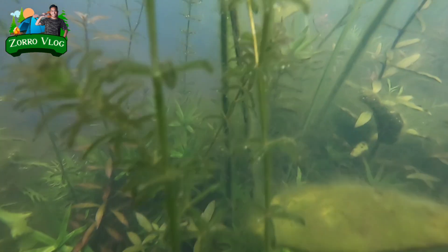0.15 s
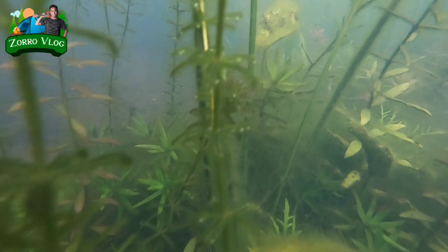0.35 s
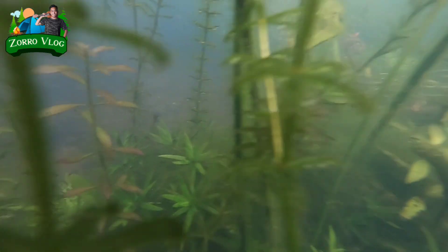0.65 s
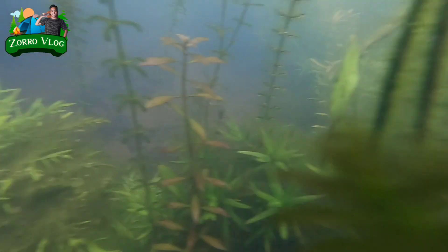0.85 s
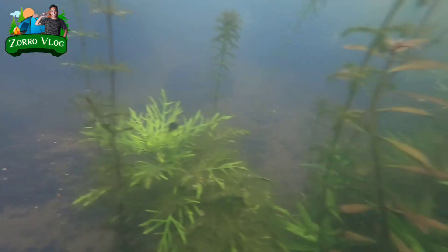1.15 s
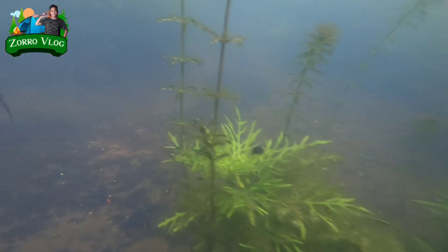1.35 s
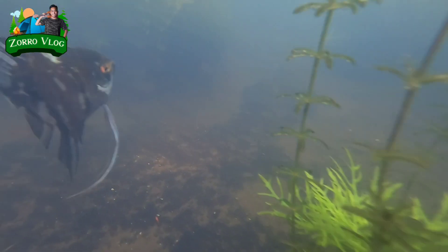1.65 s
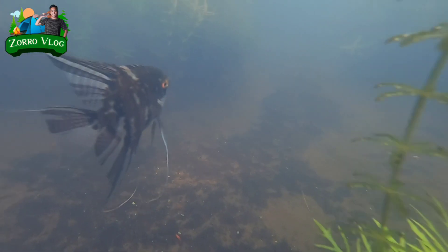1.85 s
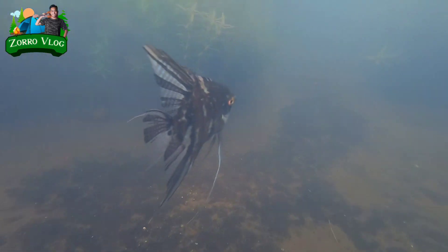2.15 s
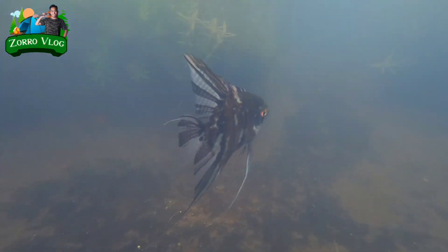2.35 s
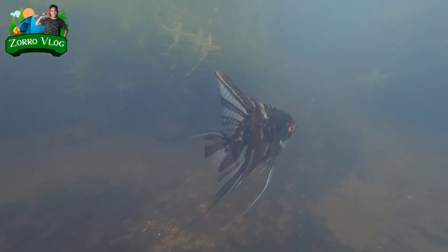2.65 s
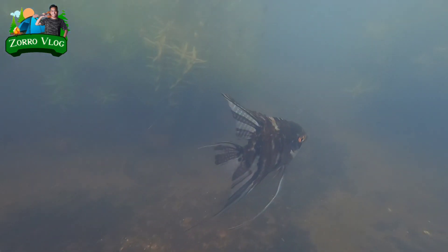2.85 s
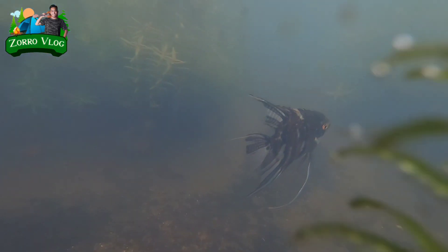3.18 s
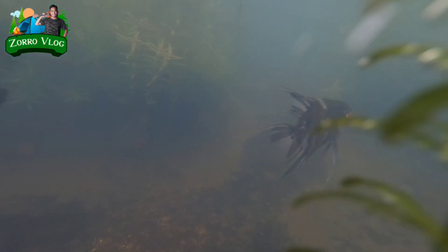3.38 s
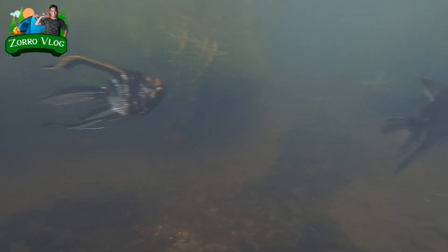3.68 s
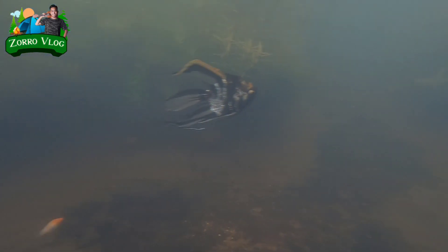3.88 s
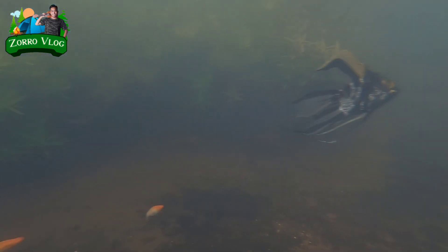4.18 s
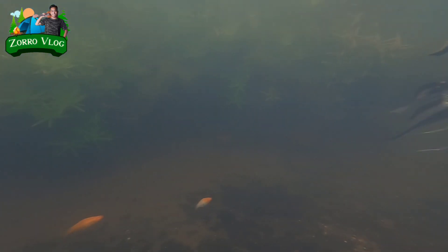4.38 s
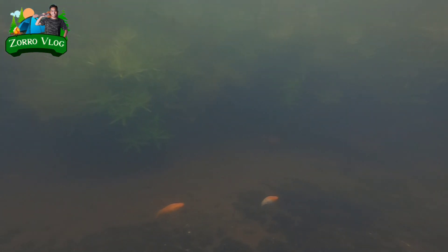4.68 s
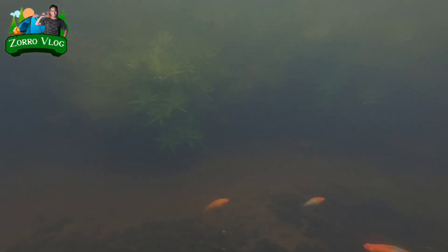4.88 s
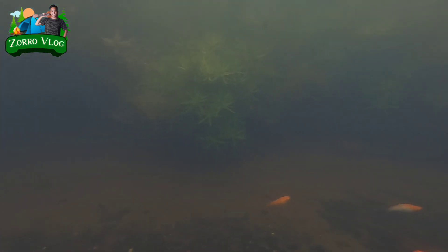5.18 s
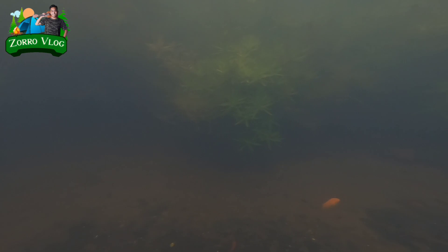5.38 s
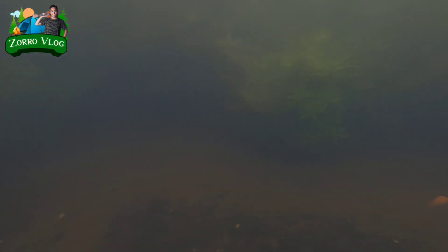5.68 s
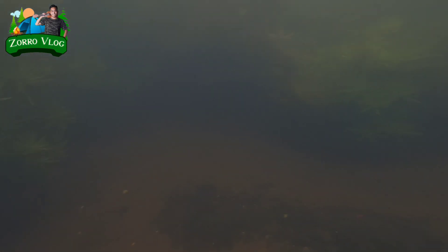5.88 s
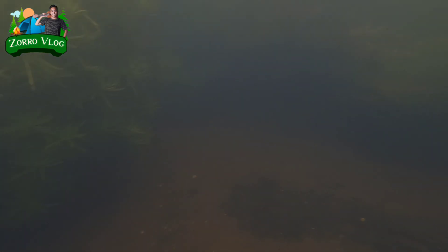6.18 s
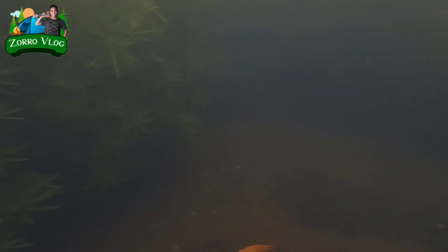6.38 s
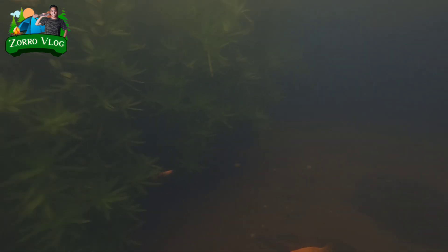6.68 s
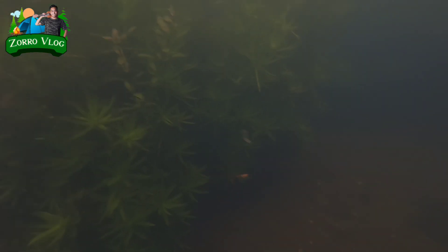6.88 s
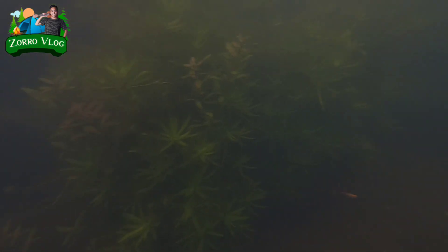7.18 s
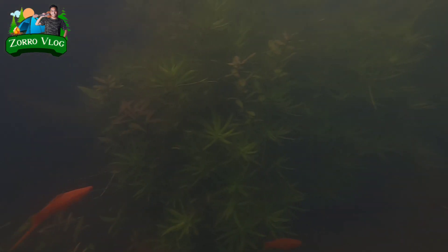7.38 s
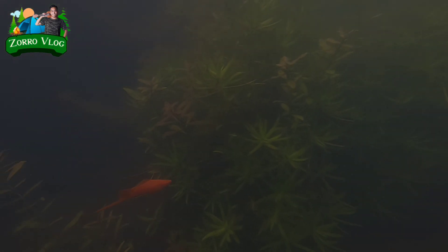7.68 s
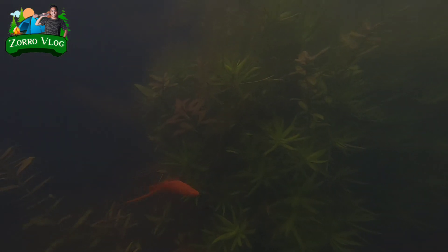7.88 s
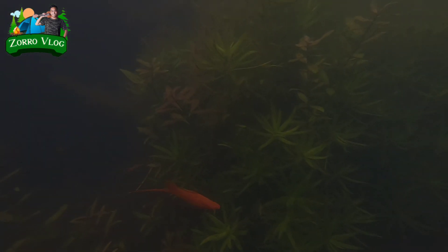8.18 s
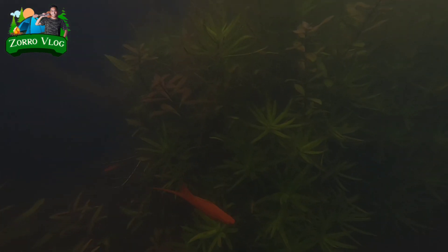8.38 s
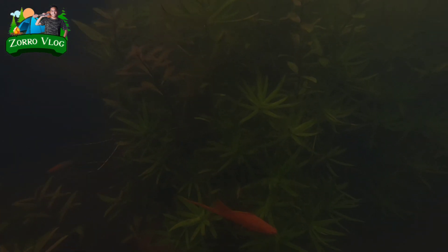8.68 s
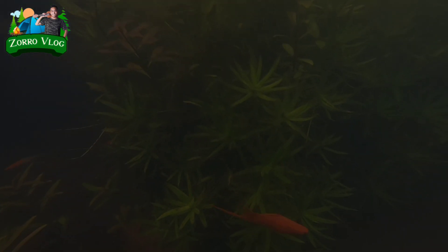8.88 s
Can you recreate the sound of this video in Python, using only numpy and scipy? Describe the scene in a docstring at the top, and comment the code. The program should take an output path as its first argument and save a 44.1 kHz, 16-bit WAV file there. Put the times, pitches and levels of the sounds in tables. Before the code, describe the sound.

Close underwater sound from inside a sealed camera case moved by hand through pond weeds. Dull rubbing and hollow knocks begin at once, with a very sharp click and short groan near one second. A dense crackling cluster of leaf scratches and ticks follows just before three seconds. The middle is quiet with sparse ticks, then heavy thumps and a hard double clunk come after six seconds, fading to faint rumble and hiss.

```python
"""Pond weeds rub, scrape and knock on a sealed camera case swept by hand: bursts of tiny slips ring its resonances.
Water pushes as low noise, bumps swing deeply, and the gripping hand thumps, creaks and sets low modes humming.
Leaves scratch and wash as filtered grains and noise; leaf tips and small clear ticks are short dying tones.
A stem groans in two gliding overtones and others hum as wavering sines, all over a steady hiss.
Two microphones hear the case almost in opposition; near the end the stereo narrows almost to mono."""
import sys
import numpy as np
from scipy import signal
from scipy.fft import rfft, irfft
from scipy.io import wavfile

SR = 44100
rng = np.random.default_rng(int(sys.argv[2]) if len(sys.argv) > 2 else 0)


def wav_out(sig):
    """Save sig, one row per channel (or a flat mono array), as 16-bit PCM at SR to the path in sys.argv[1]."""
    wavfile.write(sys.argv[1], SR, np.round(np.clip(np.atleast_2d(sig).T, -1, 1) * 32767).astype(np.int16))


N = 399105
HZ, TIME = np.fft.rfftfreq(N, 1 / SR), np.arange(N) / SR

# resonances of the sealed case: pitch_hz, half_width_hz, relative_db
CASE_MODES = [(98.5, 12.2, -8.5), (145, 8.9, -3), (211.5, 16.7, -7), (290.4, 20, -15), (437, 690, -34.5),
              (591.4, 74.4, -9.5), (615, 20, -9), (677, 216, -20.5), (837, 24, -20), (1119, 95, -20.5),
              (1446, 200, -21), (1760, 110, -29.5), (2180, 520, -41), (2687, 120, -42.5),
              (3200, 260, -48.5), (4270, 2000, -56.5)]
# how the two microphones differ: pitch_hz, left_lead_rad, left_minus_right_db, likeness (0-1)
MICROPHONE_PAIR = [(55, 0.3, 1, 0.95), (108.6, 1.77, 7, 0.7), (145.3, 1.5, -10.5, 0.5),
                   (214.4, -3.5, 11.5, 0.66), (283, -2.5, 3.5, 0.92), (476, -2.5, 1.5, 0.97),
                   (516, -3, 3.5, 1), (657, -2.5, 0, 0.98), (754, -2.5, 1.5, 1), (1230, -3, -2, 0.74),
                   (1615, -1.69, -2, 1), (2080, -2.5, -4, 0.82), (2620, -2.5, 0.5, 0.57),
                   (3530, -2.5, 1.5, 0.2), (8300, 0, 18.5, 0.34)]
# push of the water, following the speed of the sweep: start_s, level_db
WATER_PUSH = [(0.0, -38.5), (0.33, -49.5), (0.44, -46), (0.9, -32), (1.25, -42.5), (2.3, -35.5), (3.6, -38),
              (3.85, -48.5), (5.1, -46), (5.35, -43), (6.1, -34), (6.38, -23.5), (6.7, -30.5), (7.4, -36),
              (8.2, -38), (9.05, -42.5)]
# colour of that push: pitch_hz, relative_db (per Hz)
WATER_COLOUR = [(5, -15.5), (14, 15.5), (24, 5), (34, 6), (50, -10.5), (66, -7), (85, -36.5), (130, -34),
                (250, -99.5)]
# weeds and water sliding along the case: start_s, dull_db, bright_db
WEED_RUB = [(0.0, -38.5, -43.5), (0.6, -41.5, -53), (1.05, -38, -50), (1.5, -46.5, -52), (1.97, -49.5, -54),
            (2.42, -52, -58), (2.72, -40, -53), (3.0, -46.5, -55), (3.45, -50.5, -64.5), (3.65, -53, -61),
            (4.6, -62, -68), (5.75, -60, -67), (6.02, -44.5, -67.5), (6.55, -54.5, -67), (7.1, -44.5, -58),
            (7.62, -58, -72), (8.5, -66.5, -68.5), (9.05, -56.5, -67.5)]
# the hand tightens on the case: start_s, length_s, thump_db, finger_creak_db
HAND_SQUEEZES = [(0.418, 0.16, -44, -53.5), (0.656, 0.24, -47.5, -51.5), (0.844, 0.16, -39.5, -50),
                 (1.06, .16, -44.5, -49), (1.403, .16, -40, -45), (1.654, 0.3, -59, -57),
                 (2.011, 0.17, -48, -51), (2.495, .056, -55, -48), (2.845, 0.22, -50.5, -57),
                 (3.33, 0.21, -53.5, -57.5), (4.06, 0.12, -54, -64), (5.27, 0.3, -47, -56),
                 (5.689, 0.21, -42, -47), (5.905, 0.26, -41, -41), (6.232, 0.06, -39.5, -46),
                 (6.353, 0.056, -37.5, -35), (6.495, .31, -45.5, -56.5), (6.753, .094, -35.5, -46.5),
                 (6.898, 0.25, -42.5, -61), (7.144, 0.15, -46.5, -53), (7.306, 0.69, -56.5, -66.5),
                 (7.969, 0.12, -51, -62)]
# rough leaves brushing the front, one table a pass: start_s, level_db
LEAF_PASSES = [
    [(0.0, -59.5), (0.364, -63), (0.768, -58), (0.912, -48), (1.0, -74)],
    [(2.465, -70), (2.522, -53.5), (2.655, -64.5), (2.69, -44), (2.784, -43), (2.91, -60.5), (3.502, -62.5),
     (3.6, -94)],
]
# colour of the leaf scratch: pitch_hz, relative_db (per Hz)
SCRATCH_COLOUR = [(700, -11), (1200, 22.5), (1700, 9.5), (2700, 10.5), (3350, -1), (4200, 0), (5400, -8.5),
                  (6500, -6.5), (7600, -15), (8700, -8), (11000, -33.5), (14000, -38)]
# leaves pressing on the front drum hollowly: start_s, level_db
LEAF_DRUMMING = [(2.66, -86), (2.7, -49.5), (2.86, -48.5), (3.02, -64.5), (3.3, -57.5), (3.38, -59),
                 (3.5, -70), (3.62, -97)]
# the hollow body they drum on: pitch_hz, width_octaves, relative_db
HOLLOW_BODY = [(352.4, 0.11, 6.5), (416, 0.061, -3)]
# fine fronds washing smoothly over the front: start_s, length_s, level_db, pitch_hz
FROND_WASHES = [(0.0, 0.66, -75.5, 3350), (3.026, 0.26, -65, 2920)]
# a stem catches and drags: start_s, length_s, level_db, rasp_pitch_hz
STEM_SCRAPES = [(.005, 0.029, -36.5, 1010), (0.026, 0.42, -48.5, 227), (0.03, 0.14, -46.5, 980),
                (0.165, 0.086, -47.5, 2200), (0.173, 0.045, -34, 628), (0.371, 0.056, -59.5, 2850),
                (0.546, 0.019, -38.5, 560), (0.721, 0.026, -42.5, 570), (.858, 0.038, -39, 2800),
                (.859, 0.022, -36, 546), (0.898, 0.04, -44.5, 2730), (1.659, 0.17, -54.5, 1050),
                (1.785, 0.041, -55, 1210), (1.842, 0.057, -45.5, 950), (2, 0.29, -49, 540),
                (2.484, 0.0204, -43, 3100), (2.492, 0.085, -57.5, 3900), (2.52, 0.083, -60, 586),
                (2.681, 0.078, -39, 2426), (2.706, 0.032, -35.5, 1210), (2.756, 0.0377, -31, 2380),
                (2.807, 0.05, -46, 1120), (2.857, 0.1, -50, 596), (3.02, 0.33, -58, 1090),
                (3.344, 0.049, -42, 573), (3.345, 0.06, -45, 1130), (3.371, 0.031, -51, 1210),
                (3.362, 0.037, -62, 2860), (3.605, 0.53, -63, 1050), (6.372, 0.036, -39.5, 2010),
                (6.375, 0.028, -35, 994), (6.37, 0.036, -26.5, 496)]
# colour of the crackle on a scrape: pitch_hz, relative_db (per Hz)
CRACKLE_COLOUR = [(1200, -39.5), (2400, 8), (3300, 2.5), (4300, -12.5), (5400, -7.5), (6500, -12.5),
                  (7600, -18.5), (8700, -13), (11000, -29.5), (14000, -39)]
# a taut leaf sings hoarsely as it slides: start_s, length_s, level_db, pitch_hz
LEAF_RASPS = [(0.01, 0.23, -75, 3100), (0.35, 0.64, -65, 2730), (0.862, 0.014, -60, 3270),
              (0.854, 0.061, -44, 2400), (2.446, 0.242, -61, 3260), (2.808, 0.47, -63, 2650)]
# blunt blows on the case: start_s, peak_db, pitch_hz
CASE_KNOCKS = [(.324, -37, 1050), (.421, -20.5, 890), (.716, -23, 607), (0.8888, -5, 2400),
               (0.889, -32, 600), (1.078, -35.5, 1500), (1.395, -32, 1160), (1.396, -27.5, 590),
               (1.514, -34, 1870), (1.676, -31.5, 875), (1.904, -28, 910), (2.474, -23, 2760),
               (2.502, -25, 3550), (2.503, -27.5, 550), (2.687, -24, 2130), (2.722, -26, 600),
               (2.789, -40, 2500), (2.792, -23, 695), (3.016, -33, 1120), (3.017, -24, 570),
               (3.393, -33, 1100), (4.15, -34, 625), (4.3666, -27, 656), (4.567, -44, 655),
               (5.163, -35, 563), (5.35, -28.5, 1000), (5.699, -30.5, 596), (5.761, -30.5, 580),
               (5.803, -30.5, 600), (6.23, -48, 620), (6.376, -19, 940), (6.4105, -24, 2200),
               (6.411, -22, 790), (7.337, -39, 520), (7.478, -35, 860)]
# leaf tips snapping past the case: start_s, level_db (before the soft onset), pitch_hz
LEAF_SNAPS = [(0.3551, -54, 3040), (0.4874, -61, 3250), (0.6964, -53, 3400), (0.821, -53, 3350),
              (2.5104, -39.5, 4940), (2.611, -47.5, 3400), (2.6284, -52, 5550), (2.7964, -54, 6700),
              (2.8314, -44, 3400), (2.894, -45, 3700), (2.902, -42.5, 3170), (2.9198, -46, 2800),
              (2.9365, -39.5, 2670), (2.9367, -45, 4600), (2.9369, -45, 1470), (2.952, -57, 4030),
              (2.984, -56, 4330), (2.999, -44.5, 3120), (3.094, -50, 3500), (3.242, -49, 2810),
              (3.408, -54.5, 5600), (3.453, -48, 2530), (3.485, -54, 2770), (3.497, -54, 2470),
              (4.421, -52.5, 2380), (4.996, -60, 2010), (8.27, -61.5, 1750)]
# small clear ticks, many of them a faint regular ticking near 2.7 kHz, perhaps the camera's mechanism:
# start_s, level_db (before the soft onset), pitch_hz
SMALL_TICKS = [(.589, -43.5, 2140), (1.946, -60, 2870), (2.07, -50, 2530), (2.325, -51, 2740),
               (2.867, -43, 6500), (2.9854, -33.5, 2550), (3.28, -48.5, 2770), (3.68, -42, 4950),
               (3.6795, -52, 3800), (3.6797, -55, 2280), (3.829, -49, 2700), (3.937, -42.5, 1870),
               (4.187, -50.5, 2640), (4.575, -50, 2600), (4.958, -49, 2630), (5.329, -54, 2530)]
# a stiff stem strikes twice: start_s, level_db (before the soft onset), pitch_hz
STEM_CLUNKS = [(6.3725, -20.5, 1567), (6.4103, -23.5, 1606)]
# the lowest modes of the case: pitch_hz, t60_s, left_lead_rad, left_minus_right_db
LOW_MODES = [(98.95, 0.2, 0.82, 4), (146.8, 0.42, 1.85, -11.5), (214.7, 0.35, -2, 5.5)]
# pushes of the hand: start_s, length_s, first_mode_db, second_mode_db, third_mode_db
HAND_JOLTS = [(0.38, 0.26, -51.5, -49, -55.5), (0.84, 0.15, -41, -48, -51.5),
              (1.06, 0.17, -45.5, -52, -47.5), (1.4, 0.085, -44, -45, -51.5),
              (1.51, 0.064, -45, -43, -45.5), (2.87, 0.14, -44, -48, -50), (5.41, 0.071, -48.5, -44.5, -54),
              (5.699, 0.17, -37.5, -40, -70), (5.9, 0.074, -37.5, -47, -61),
              (6.01, 0.11, -38.5, -43.5, -48), (6.23, 0.076, -40, -55, -47.5),
              (6.373, 0.065, -48, -32.5, -55), (6.771, 0.098, -37.5, -50, -40.5),
              (6.9, 0.068, -43, -52.5, -49), (7.055, 0.11, -38, -41.5, -54),
              (8.215, 0.036, -66, -51.5, -77), (8.374, 0.045, -73, -51.5, -85)]
# the camera bumps through the water: start_s, level_db (before onset and decay), pitch_hz
WATER_BUMPS = [(0.426, -24, 41.4), (0.875, -29, 44), (1.539, -25, 47), (6.245, -23, 48.5),
               (6.48, -27.5, 42)]
# a stem bends against the case: start_s, base_pitch_hz, level_db (before the overtone mix)
STEM_GROAN = [(0.78, 141.2, -58), (0.839, 140.4, -47), (0.9, 146.3, -33.5), (0.96, 145, -44),
              (1.02, 151.2, -44), (1.09, 161.1, -68)]
# overtones of the groan that the case lets through: multiple, relative_db
GROAN_OVERTONES = [(3, -8.5), (4, -1.5)]
# a smooth stem makes the case sing on its main resonance: start_s, length_s, level_db, pitch_hz
STEM_HUMS = [(3.972, 0.16, -60.5, 595), (4.106, 0.043, -52.5, 612), (4.427, 0.022, -57.5, 590),
             (4.701, 0.03, -62, 616), (4.718, 0.11, -62.5, 614), (6.791, 0.054, -41.5, 606.2),
             (7.21, 0.21, -55, 604), (8.342, 0.055, -55.5, 610)]
# soft weed swishing past: peak_s, rise_s, fall_s, dull_db, bright_db, bright_skirt_pitch_hz
WEED_SWISHES = [(5.449, 0.03, 0.061, -51, -55, 1620), (6.051, 0.079, 0.057, -42.5, -42.5, 1940),
                (6.293, 0.037, 0.078, -40, -53.5, 1630), (6.811, 0.03, 0.055, -37, -43, 2430),
                (7.054, 0.018, 0.016, -46, -50, 1400), (7.165, 0.035, 0.028, -50.5, -54, 1510),
                (8.05, 0.11, 0.059, -63, -61.5, 1630)]
# colour of the microphone hiss: pitch_hz, relative_db (per Hz)
HISS_COLOUR = [(20, -7), (150, 17.5), (300, 2.5), (450, -5.5), (600, 4.5), (1100, -3.5), (1700, -6.5),
               (2700, -4.5), (4000, -11), (7000, -18), (10000, -18.5), (11500, -36.5), (14000, -44)]
# stereo width: start_s, side_db
STEREO_WIDTH = [(7.6, -4.5), (8.0, -13.5), (8.4, -24), (9.0, -41)]

HISS_DB = -67
EDGE_HZ = 13500  # upper band limit
SQUEEZE_ATTACK_S, SQUEEZE_RELEASE_S = 0.008, 0.034
FLEX_DB = -2  # flex of the case in a squeeze, re its thump
RUB_FLEX_DB, RUB_GRIP_DB = -27.5, -13  # the weeds' drag also loads case and fingers, re the dull rub
MIDDLE_EVEN_DB = -48  # here the middle resonance equals the bright rub
MIDDLE_GROWTH = 0.97  # dB of middle per dB of bright rub
CRACKLE_FULL_HZ, CRACKLE_DB_PER_OCTAVE, CRACKLE_LEAST_DB = 2844, 69, -56  # higher rasps crackle more


def amp(db):
    """Decibels to gain."""
    return 10 ** (np.asarray(db) / 20)


def unit(x):
    """Scales to rms 1."""
    return x / np.sqrt(np.mean(x ** 2) + 1e-30)


def read(points, column=1):
    """A table over frequency, joined on a log axis."""
    table = np.array(points)
    return np.interp(np.log(HZ + 1), np.log(table[:, 0] + 1), table[:, column])


def level(rows, column=1):
    """A dB curve over time as a gain."""
    table = np.array(rows)
    return amp(np.interp(TIME, table[:, 0], table[:, column]))


def add(mix, s, sound):
    """Mixes a sound in at time s."""
    part = mix[..., round(s * SR):][..., :sound.shape[-1]]
    part += sound[..., :part.shape[-1]]


def shaped(x, gain):
    """Filters by a gain per frequency, to rms 1."""
    return unit(irfft(rfft(x) * gain, N))


def band(x, centre_hz, octaves, order=2):
    """Band-pass around a pitch."""
    edges = centre_hz * 2 ** (np.array([-.5, .5]) * octaves)
    edges = np.clip(edges, 5, .49 * SR)
    return signal.sosfilt(signal.butter(order, edges, "band", fs=SR, output="sos"), x)


def flutter(per_s, depth_db, step=32):
    """A random gain that wanders about per_s times a second."""
    coarse = TIME[::step]
    noise = rng.standard_normal(len(coarse))
    slow = np.exp(-(np.fft.rfftfreq(len(coarse), step / SR) / per_s) ** 2)
    wander = irfft(rfft(noise) * slow, len(coarse))
    return amp(depth_db * np.interp(TIME, coarse, unit(wander)))


def slips(per_s, spread_db):
    """Friction as tiny slips of either sign; a positive spread makes a few much larger, a negative one smaller."""
    size = amp(spread_db * np.minimum(rng.exponential(1, N), 4))
    sign = rng.choice([-1, 1], N)
    happens = rng.random(N) < per_s / SR
    return unit(size * sign * happens)


def case_response(size=8192):
    """How the case answers one tap: its resonances, starting sharply and dying away."""
    hz = abs(np.fft.fftfreq(size, 1 / SR))
    power = sum(amp(db) ** 2 / (1 + ((hz - f) / width) ** 2) ** 2 for f, width, db in CASE_MODES)
    log_gain = np.log(power + 1e-12) / 2
    minimum_phase = np.exp(signal.hilbert(log_gain).conj())  # puts the energy as early as possible
    return np.fft.ifft(minimum_phase).real


def water(port_lag_s=0.0036):
    """Low pressure noise of the moving water; it reaches the right microphone a moment later."""
    push = level(WATER_PUSH) * shaped(rng.standard_normal(N), amp(read(WATER_COLOUR)))
    return np.array([push, np.interp(TIME - port_lag_s, TIME, push)])


def hiss():
    """Steady coloured noise of the microphones, separate on each side."""
    return amp(HISS_DB) * shaped(rng.standard_normal((2, N)), amp(read(HISS_COLOUR)))


def squeezing(column):
    """All squeezes as one gain: each rises, holds and dies away."""
    out, t = np.zeros(N), TIME[:SR]
    for row in HAND_SQUEEZES:
        attack = np.minimum(t / SQUEEZE_ATTACK_S, 1)
        release = np.exp(-np.maximum(t - row[1], 0) / SQUEEZE_RELEASE_S)
        add(out, row[0], amp(row[column]) * attack * release)
    return out


def handling(case):
    """Squeezes thump and drive the low case resonances; sliding weeds drive the middle and upper ones."""
    def drive(force, centre_hz, octaves):
        """Rings the case with one band of a force."""
        return unit(signal.oaconvolve(band(force, centre_hz, octaves), case)[:N])
    flex = drive(slips(per_s=300, spread_db=0.5), centre_hz=81.1, octaves=0.67)
    grip = drive(slips(per_s=350, spread_db=2.5), centre_hz=220.0, octaves=1.73)
    friction = slips(per_s=1400, spread_db=3.0) * flutter(per_s=7.7, depth_db=3.5)
    dull, bright = level(WEED_RUB), level(WEED_RUB, column=2)
    middle = amp(MIDDLE_EVEN_DB) * (bright / amp(MIDDLE_EVEN_DB)) ** MIDDLE_GROWTH
    rub = dull * drive(friction, centre_hz=568, octaves=1.53)
    rub += middle * drive(friction, centre_hz=1041, octaves=0.91)
    rub += bright * drive(friction, centre_hz=2060, octaves=0.87)
    squeeze = squeezing(column=2)
    thump = squeeze * unit(band(rng.standard_normal(N), centre_hz=51.4, octaves=0.72, order=3))
    flex *= np.hypot(amp(FLEX_DB) * squeeze, amp(RUB_FLEX_DB) * dull)
    grip *= np.hypot(squeezing(column=3), amp(RUB_GRIP_DB) * dull)
    return thump + flex + grip + rub


def leaves():
    """Rough leaves scratch at the microphones, each pitch in its own spurts, and drum on the hollow front."""
    touch = sum(level(rows) * (TIME > rows[0][0]) * (TIME < rows[-1][0]) for rows in LEAF_PASSES)
    grains = np.zeros(N)
    for hz in np.geomspace(1100, 11000, 9):
        spurts = slips(per_s=900, spread_db=-3.5) * flutter(per_s=37, depth_db=7.5)
        grains += band(spurts, hz, octaves=0.38)
    scratch = touch * shaped(grains, amp(read(SCRATCH_COLOUR)))
    force = slips(per_s=990, spread_db=0.5)
    drum = unit(sum(amp(db) * band(force, hz, octaves) for hz, octaves, db in HOLLOW_BODY))
    return scratch + level(LEAF_DRUMMING) * drum


def washes(width_octaves=0.53):
    """Countless tiny contacts merge into a smooth, bright wash of band-passed noise."""
    out = np.zeros(N)
    for s, length, db, hz in FROND_WASHES:
        press = signal.windows.tukey(int(length * SR), 0.2)
        noise = rng.standard_normal(len(press))
        add(out, s, amp(db) * press * unit(band(noise, hz, width_octaves, order=3)))
    return out


def scrapes(case):
    """Short dense runs of slips ring the case, with crackle on top."""
    out, force = np.zeros(N), slips(per_s=7100, spread_db=3.0)
    crackle = shaped(slips(per_s=1400, spread_db=5.5), amp(read(CRACKLE_COLOUR)))
    for s, length, db, hz in STEM_SCRAPES:
        taper = min(0.084 + length / 0.58, 1)  # long drags swell gradually
        press = signal.windows.tukey(max(int(length * SR), 16), taper)
        at = round(s * SR) + np.arange(len(press))
        rasp = band(signal.fftconvolve(force[at] * press, case), hz, octaves=0.81)
        rasp *= np.sqrt(len(press) / np.sum(rasp ** 2))  # level counted over the length of the drag
        crackle_db = CRACKLE_DB_PER_OCTAVE * np.log2(hz / CRACKLE_FULL_HZ)
        crackle_db = np.clip(crackle_db, CRACKLE_LEAST_DB, 0)
        add(out, s, amp(db) * rasp)
        add(out, s, amp(db + crackle_db) * press * crackle[at])
    return out


def rasps(width_octaves=0.051):
    """Uneven slips ring one narrow, bright resonance."""
    out, force = np.zeros(N), slips(per_s=1500, spread_db=4.0) * flutter(per_s=140, depth_db=5.5)
    for s, length, db, hz in LEAF_RASPS:
        press = signal.windows.tukey(int(length * SR), 0.15)
        slide = force[round(s * SR):][:len(press)]
        add(out, s, amp(db) * press * unit(band(slide, hz, width_octaves, order=1)))
    return out


def knocks(case, chatter=0.073, chatter_s=0.005):
    """Each blow is a push with a brief chatter; its pitch sets how far the microphones are out of step."""
    out, leads = np.zeros((2, N)), read(MICROPHONE_PAIR)
    for s, db, hz in CASE_KNOCKS:
        force = chatter * rng.standard_normal(1024) * np.exp(-TIME[:1024] / chatter_s)
        force[0] = 1
        knock = signal.hilbert(band(signal.fftconvolve(force, case), hz, octaves=0.92))
        turn = np.exp(.5j * np.interp(hz, HZ, leads) * np.array([[1], [-1]]))  # half the lead on each side
        add(out, s, amp(db) * np.real(knock * turn) / abs(knock).max())
    return out


def pings(rows, cycles, noisy, octaves, rise_s=0.0009):
    """A quickly dying tone with a noisy edge; high ones die sooner, and pitch sets the left-right balance."""
    out, t, tilt_db = np.zeros((2, N)), TIME[:SR // 10], read(MICROPHONE_PAIR, column=2)
    for s, db, hz in rows:
        t60, pan_db = cycles / hz, np.interp(hz, HZ, tilt_db)
        edge = unit(band(rng.standard_normal(len(t)), hz, octaves, order=3))
        edge *= np.exp(-t / t60)  # the edge dies sooner than the tone
        body = (np.sin(2 * np.pi * hz * t) + noisy * edge) / np.hypot(1, noisy / 2)
        onset = 1 - np.exp(-(t / rise_s) ** 2)
        tick = signal.hilbert(amp(db - 60 * t / t60) * onset * body)
        sides = np.real(tick * np.exp([[0], [1.1j]]))  # the right microphone leads
        add(out, s, sides * amp([[pan_db / 2], [-pan_db / 2]]))
    return out


def ticks():
    """Leaf tips snap, short and noisy; the small clear ticks ring almost clean; the stiff stem clunks."""
    snaps = pings(LEAF_SNAPS, cycles=66, noisy=0.84, octaves=1.0)
    clear = pings(SMALL_TICKS, cycles=55, noisy=0.25, octaves=0.49)
    clunks = pings(STEM_CLUNKS, cycles=49, noisy=0.23, octaves=0.94, rise_s=0.00082)
    return snaps + clear + clunks


def jolts(rise_s=0.0047, waver_hz=1.5):
    """While the hand pushes, the low modes of the case hum almost steadily, then ring out."""
    out, t = np.zeros((2, N)), TIME[:SR]
    for k, (hz, t60, lead, pan_db) in enumerate(LOW_MODES):
        power = np.zeros(N)
        for s, length, *dbs in HAND_JOLTS:
            decay = amp(dbs[k] - 60 * np.maximum(t - length, 0) / t60)
            add(power, s, ((1 - np.exp(-t / rise_s)) * decay) ** 2)
        turns = np.cumsum(hz + waver_hz * shaped(rng.standard_normal(N), HZ < 10)) / SR
        tone = np.sin(2 * np.pi * turns + np.array([[lead], [0]]))
        out += np.sqrt(power) * unit(amp([[pan_db / 2], [-pan_db / 2]])) * tone
    return out


def bumps(rise_s=0.011, t60=0.26):
    """A sudden move gives a few deep swings of pressure."""
    out, t = np.zeros(N), TIME[:SR]
    for s, db, hz in WATER_BUMPS:
        envelope = amp(db - 60 * t / t60) * (1 - np.exp(-(t / rise_s) ** 2))
        add(out, s, envelope * np.sin(2 * np.pi * hz * t))
    return out


def groan(right_lead_rad=2.37):
    """Regular slips of a bending stem: two clean overtones glide together, mostly upwards."""
    s, hz, _ = np.transpose(STEM_GROAN)
    turns = np.cumsum(np.interp(TIME, s, hz)) / SR
    lead = np.array([[0], [right_lead_rad]])
    tone = sum(amp(db) * np.sin(2 * np.pi * round(k) * turns + lead) for k, db in GROAN_OVERTONES)
    sounding = (TIME > s[0]) * (TIME < s[-1])
    return np.sqrt(2) * level(STEM_GROAN, column=2) * sounding * tone


def hums(waver=0.038):
    """Brief tones that swell and fade, their pitch wavering by a small fraction."""
    out, drift = np.zeros((2, N)), shaped(rng.standard_normal(N), np.exp(-(HZ / 40) ** 2))
    for s, length, db, hz in STEM_HUMS:
        swell = signal.windows.tukey(max(int(length * SR), 16), .7)
        pitch = hz * (1 + waver * drift[round(s * SR):][:len(swell)])
        turns = np.cumsum(pitch) / SR
        tone = np.sin(2 * np.pi * turns + np.array([[0], [1.3]]))  # the right side leads
        add(out, s, amp(db) * np.sqrt(2) * swell * tone)
    return out


def swishes(case, skirt_db=1, lower_db=2.5):
    """Uneven friction rings the case, swelling and fading; two narrow bright bands sit in a broad skirt."""
    friction = slips(per_s=4200, spread_db=2.5) * flutter(per_s=58, depth_db=2.8)
    rung = signal.oaconvolve(friction, case)[:N]
    out, dull = np.zeros(N), unit(band(rung, centre_hz=440, octaves=1.0))
    core = unit(band(rung, centre_hz=1677, octaves=0.31))
    for s, rise, fall, dull_db, bright_db, hz in WEED_SWISHES:
        near = abs(TIME - s) < .4
        t = TIME[near] - s
        swell = np.exp(-.5 * (t / np.where(t < 0, rise, fall)) ** 2)
        skirt = amp(skirt_db) * unit(band(rung[near], hz, octaves=1.28))
        lower = amp(lower_db) * unit(band(rung[near], centre_hz=1036, octaves=0.28))
        bright = unit(core[near] + skirt + lower)
        out[near] += amp(dull_db) * swell ** 0.69 * dull[near]  # the dull part swells wider
        out[near] += amp(bright_db) * swell * bright
    return out


def microphones(shared, apart):
    """The flexing case reaches the two microphones out of step; 'apart' is what they do not share."""
    lead, tilt_db, alike = (read(MICROPHONE_PAIR, column=k) for k in range(1, 4))
    alike = np.clip(alike, 0, 1)
    sides = np.array([[1], [-1]])
    spectra = np.sqrt((1 + alike) / 2) * rfft(shared) + sides * np.sqrt((1 - alike) / 2) * rfft(apart)
    balance = amp(sides * tilt_db / 2)
    balance /= np.sqrt(np.mean(balance ** 2, axis=0))
    return irfft(spectra * np.exp(.5j * sides * lead) * balance, N)


def scene():
    """Everything that touches the case, with the water and the hiss of the microphones."""
    case = case_response()

    def contact():
        """One independent draw of all the friction and handling."""
        return handling(case) + leaves() + washes() + scrapes(case) + rasps() + swishes(case)
    body = microphones(shared=contact(), apart=contact())
    strikes = knocks(case) + ticks()
    tones = jolts() + groan() + hums()
    return water() + bumps() + body + strikes + tones + hiss()


def record(dry):
    """The stereo image narrows almost to mono and the sound ends softly; then the band limit."""
    dry = dry * np.sin(np.pi / 2 * np.minimum(TIME[::-1] / .03, 1)) ** 2  # 30 ms fade at the end
    mid, side = dry.mean(0), (dry[0] - dry[1]) / 2 * level(STEREO_WIDTH)
    lowpass = signal.firwin(511, EDGE_HZ, window=("kaiser", 9), fs=SR)
    return signal.oaconvolve(np.array([mid + side, mid - side]), lowpass[None], "same", axes=1)


dry = scene()
out = record(dry)
wav_out(out)
```